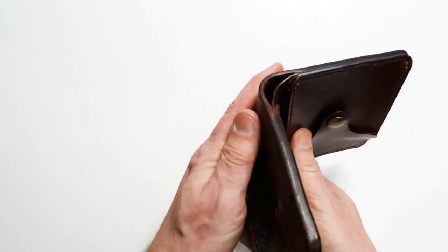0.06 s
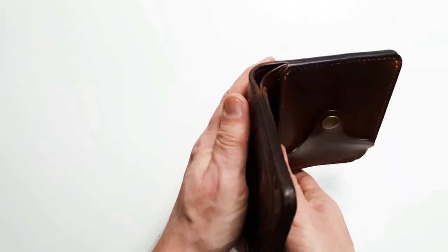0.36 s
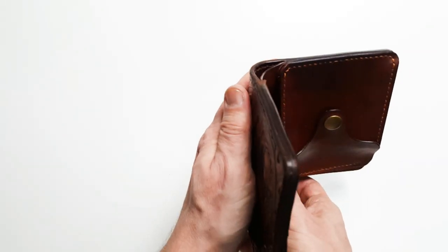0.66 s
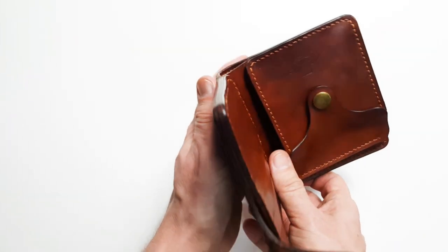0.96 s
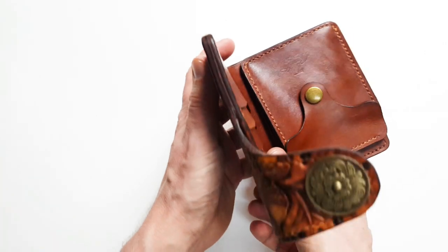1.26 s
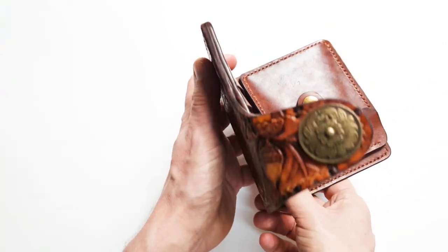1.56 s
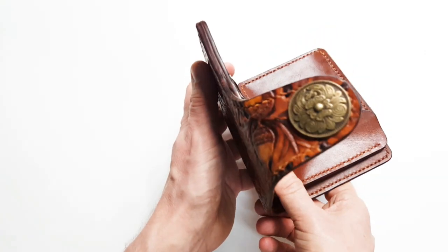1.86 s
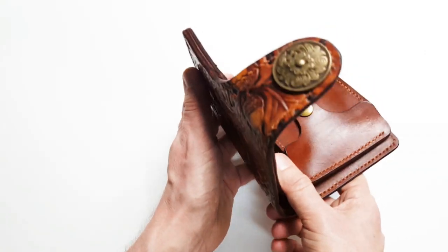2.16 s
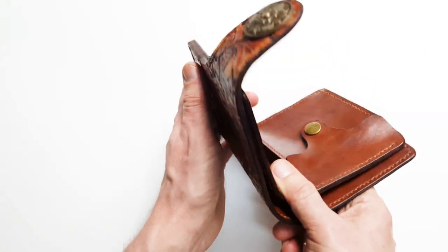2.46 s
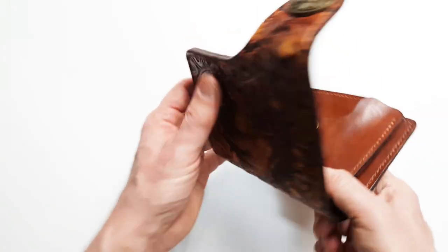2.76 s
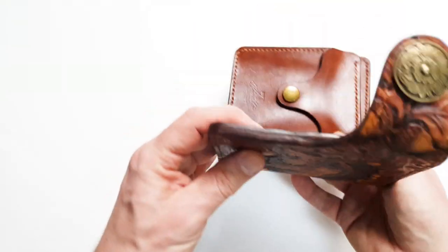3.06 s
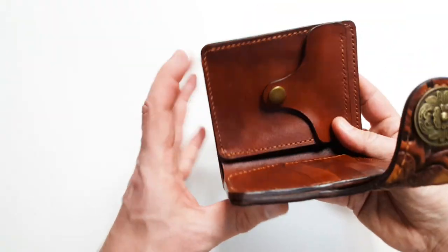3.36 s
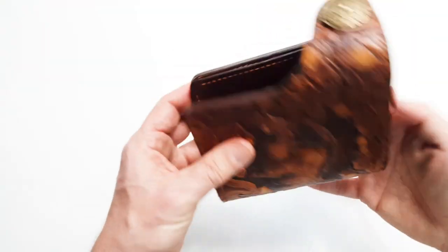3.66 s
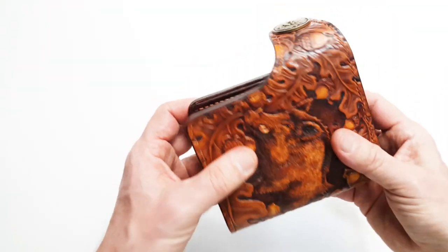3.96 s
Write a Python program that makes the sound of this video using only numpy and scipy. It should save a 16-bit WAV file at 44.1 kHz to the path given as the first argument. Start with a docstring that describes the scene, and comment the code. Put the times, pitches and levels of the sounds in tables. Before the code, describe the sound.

Leather creaks as a wallet is turned and opened close to the microphone in a quiet room. Fingers slide softly and the fold ticks; near the end, leather scrapes on leather with a brief squeak and sharp snaps.

```python
"""A stiff leather wallet, turned and opened by two hands close to the microphone in a quiet room.
Fingers slide over the hide and the fold ticks as it bends. Near the end leather grips on leather
and creaks: a squeak of fast slips that slows into a rattle, then single snaps.
Friction is streams of tiny catches; each tick or snap is a noise crack plus damped modes."""
import sys
import numpy as np
from scipy import signal
from scipy.fft import rfft, irfft, next_fast_len
from scipy.io import wavfile

SR = 44100
rng = np.random.default_rng(int(sys.argv[2]) if len(sys.argv) > 2 else 0)


def unload_wav(signal):
    """Save mono or channel-first audio to the path in sys.argv[1] as 16-bit WAV at rate SR, clipped to [-1, 1]."""
    wavfile.write(
        sys.argv[1],
        SR,
        np.round(np.clip(np.atleast_2d(signal).T, -1, 1) * 32767).astype(np.int16),
    )


N = 176400
TIME = np.arange(N) / SR
SIDE_DB = -8   # side re mid, ahead of the width filter
SCRAPE_GRAINS_PER_S, SCRAPE_GRAIN_DB = 2700, 2.5

# stiff cover modes: freq_hz, gain_db, t60_s
COVER_MODES = [(1092, 0.5, 0.0078), (1297, -0.5, 0.011), (1620, 1, 0.0059), (2180, -1, 0.0063),
               (2466, -2.5, 0.0059), (3930, -15.5, 0.0027), (5270, -27.5, 0.012), (6310, -25, 0.0031)]


def from_db(db):
    return 10 ** (np.asarray(db) / 20)


def unit_rms(x):
    return x / np.sqrt(np.mean(x ** 2) + 1e-20)


def curve(rows):
    """Linear interpolation of time_s, value rows."""
    return np.interp(TIME, *np.transpose(rows))


def wobble(rate_hz):
    """Random drift, rms 1."""
    return unit_rms(np.interp(TIME * rate_hz, np.arange(N), rng.standard_normal(N)))


def bandpass(x, low_hz, high_hz):
    sos = signal.butter(2, [low_hz, high_hz], "band", fs=SR, output="sos")
    return signal.sosfilt(sos, x + 1e-18)


def coloured(x, colour):
    """FFT filter from freq_hz, gain_db rows."""
    hz, db = np.transpose(colour)
    size = next_fast_len(x.shape[-1] + 4096)
    bins_hz = np.maximum(np.arange(size // 2 + 1) * SR / size, 1)
    gain = from_db(np.interp(np.log(bins_hz), np.log(hz), db))
    return irfft(rfft(x, size) * gain, size)[..., :x.shape[-1]]


def stereo(mid, side):
    """Mid/side to left/right: narrow bass, wide treble."""
    # stereo width: freq_hz, side_gain_db
    width = [(60, -13.5), (160, -16), (350, -8), (700, -4), (1300, -6), (2400, -0.5), (4200, 0.5),
             (15000, -0.5)]
    return mid + coloured(side, width) * np.array([[1], [-1]])


def grains(per_s, spread_db):
    """Two independent streams of tiny friction catches of uneven size."""
    sizes = from_db(spread_db * np.minimum(rng.exponential(1, (2, N)), 5))
    signs = rng.choice([-1, 1], (2, N))
    return sizes * signs * (rng.random((2, N)) < per_s / SR)


def texture(streams, colour):
    """Two streams, filtered and normalised, as mid and side of a stereo sound."""
    return stereo(*unit_rms(coloured(streams, colour)))


def releases(events, modes, low_cut_hz, crack_top_hz, crack_db):
    """Crack plus ringing modes, mid/side. Events: start_s, level_db, bite_db, pitch_ratio."""
    build_cycles, treble_hz, mode_spread_db = 0.14, 1840, 1.1
    crack_t60_s, crack_low_hz = 0.0081, 2930
    lead = SR // 500   # pre-ring of the zero-phase low cut
    t = np.maximum(np.arange(SR // 50) - lead, 0) / SR
    hz, mode_db, t60_s = np.transpose(modes)[:, :, None]
    sign = (-1) ** np.arange(len(modes))[:, None]
    envelopes = sign * (1 - np.exp(-t * hz / build_cycles)) * from_db(mode_db - 60 * t / t60_s)
    low_cut = signal.butter(4, low_cut_hz, "high", fs=SR, output="sos")
    treble = np.clip(np.log2(hz[:, 0] / treble_hz), 0, 1)   # share of bite_db per mode
    bursts = rng.standard_normal((len(events), 2, len(t))) * (t > 0) * from_db(-60 * t / crack_t60_s)
    cracks = bandpass(bursts, crack_low_hz, crack_top_hz)
    scatter = rng.standard_normal((len(events), 2, len(modes)))
    out = np.zeros((2, N + len(t)))
    for (start_s, level_db, bite_db, ratio), crack, (uneven, sideways) in zip(events, cracks, scatter):
        rings = signal.sosfiltfilt(low_cut, envelopes * np.sin(2 * np.pi * hz * ratio * t))
        mid_gains = from_db(mode_spread_db * uneven + bite_db * treble)
        side_gains = mid_gains * sideways * from_db(SIDE_DB)
        body = np.array([mid_gains, side_gains]) @ rings / np.abs(rings.sum(0)).max()
        at = min(int(start_s * SR) - lead, N - 1)
        out[:, at:at + len(t)] += from_db(level_db) * (body + from_db(crack_db + bite_db) * crack)
    return out[:, :N]


def room_air():
    """Still air: steady noise, mostly bass."""
    # air spectrum: freq_hz, gain_db
    colour = [(20, 6), (32, -3), (55, -21.5), (100, -3.5), (180, 1), (300, -7.5), (430, -10), (800, -14),
              (1500, -25.5), (3000, -27.5), (7000, -34.5), (16000, -34)]
    return from_db(-65) * texture(rng.standard_normal((2, N)), colour)


def finger_slide():
    """Skin on hide: dense catches make a fine, fluttering hiss."""
    # hiss envelope: time_s, level_db
    levels = [(0, -97), (.25, -80), (.41, -66), (.45, -73.5), (.52, -71.5), (.62, -89), (.85, -79),
              (.94, -71.5), (1.05, -70.5), (1.11, -75.5), (1.2, -66.5), (1.32, -76), (1.5, -85),
              (1.72, -80.5), (1.98, -85), (2.13, -71), (2.27, -75), (2.32, -62), (2.37, -66), (2.43, -61),
              (2.55, -69), (2.67, -83), (2.77, -69.5), (2.85, -62), (2.9, -69.5), (3.01, -65.5),
              (3.11, -79), (3.27, -72), (3.35, -81), (3.46, -72), (3.53, -79.5), (3.6, -65), (3.67, -63.5),
              (3.78, -62), (3.88, -60.5), (3.92, -72), (3.96, -63.5), (4, -60)]
    # hiss spectrum: freq_hz, gain_db
    colour = [(1500, 0.5), (3000, -8.5), (5000, -9.5), (8500, -10.5), (11500, -4.5), (14000, -11.5),
              (16000, -17)]
    flutter_db = 1.1 * wobble(rate_hz=44.4)
    return from_db(curve(levels) + flutter_db) * texture(grains(per_s=7000, spread_db=3), colour)


def leather_scrape():
    """Leather dragging on leather: sparser catches make a grainy scrape."""
    # scrape envelope: time_s, level_db
    levels = [(0, -74), (.39, -70), (.58, -73.5), (.75, -78), (.93, -68), (1.1, -71.5), (1.24, -68),
              (1.35, -74.5), (1.95, -71.5), (2.25, -65), (2.38, -68), (2.45, -59.5), (2.51, -69.5),
              (2.66, -74.5), (2.76, -63), (2.9, -70), (3.0, -63), (3.11, -70.5), (3.47, -68), (3.53, -70),
              (3.57, -61), (3.66, -47), (3.76, -46.5), (3.88, -51.5), (3.92, -56), (3.98, -57), (4, -40.5)]
    # scrape spectrum: freq_hz, gain_db
    colour = [(300, -22.5), (600, -15), (1000, 1.5), (1500, 4.5), (2100, -4), (2900, -5.5), (4200, -13.5),
              (7000, -22), (15000, -33)]
    return from_db(curve(levels)) * texture(grains(SCRAPE_GRAINS_PER_S, SCRAPE_GRAIN_DB), colour)


def handling_rumble():
    """Dull noise of the wallet shifting in the hands."""
    # rumble envelope: time_s, level_db
    levels = [(0, -67.5), (1.2, -65.5), (1.5, -69), (1.85, -64), (2.2, -65), (2.33, -56), (2.45, -63),
              (2.7, -66.5), (3.1, -67), (3.38, -64), (3.65, -57.5), (3.87, -58.5), (4, -59)]
    # rumble spectrum: freq_hz, gain_db
    colour = [(40, -17.5), (75, -2.5), (120, -2), (180, -5.5), (300, -6), (450, -25), (900, -21.5),
              (3000, -58)]
    return from_db(curve(levels)) * texture(rng.standard_normal((2, N)), colour)


def fold_ticks():
    """The bending fold ticks and rings briefly; mid/side."""
    # fold ticks: start_s, level_db, bite_db, pitch_hz
    ticks = [(0.1346, -53.5, -13, 1400), (0.182, -56, -2, 1490), (0.411, -46.5, 7, 1540),
             (1.368, -49.5, 7.5, 1630), (1.38, -49, -4, 1150), (1.5602, -49.5, 3, 1530),
             (1.6368, -56.5, 11, 1400), (1.7323, -49.5, -5, 1280), (1.834, -54.5, -1, 1390),
             (1.8538, -57, -2, 1510), (1.8937, -49, -0.5, 1480), (1.935, -48, -1, 1460),
             (2.0415, -49.5, 2.5, 1470), (2.0469, -53, 1, 1450), (2.0754, -44, 0, 1530),
             (2.1132, -44.5, 2, 1500), (2.12, -47, -4, 1500), (2.146, -44, 5.5, 1520),
             (2.162, -43, -3, 1500), (2.199, -40.5, 3, 1510), (2.2446, -38.5, 1.5, 1500),
             (2.2803, -41.5, -1, 1490), (2.3, -41.5, 0, 1490), (2.3302, -47.5, 5, 1460),
             (2.3364, -41, 2, 1450), (2.362, -47.5, 1, 1480), (2.5935, -51.5, -4, 1510),
             (2.619, -52.5, 3.5, 1530), (2.7018, -47, 0, 1480), (2.726, -43, -3, 1490),
             (2.7312, -51, -2, 1620), (2.735, -46, -8, 1550), (2.7484, -47.5, -6, 1530),
             (2.776, -46, -6, 1515), (2.8247, -48, -12, 1350), (2.831, -43.5, -5, 1430),
             (2.8347, -44, -4, 1660), (2.8392, -42, -3, 1460), (2.861, -48, -6, 1490),
             (2.9298, -46, -14, 1275), (3.006, -50, -12, 1380)]
    # bent fold modes: freq_hz, gain_db, t60_s
    modes = [(1040, 2, 0.0023), (1495, 8.5, 0.012), (2380, -13, 0.0046), (3530, -6, 0.009),
             (5400, -17, 0.0073), (8800, -24, 0.0039)]
    main_hz = modes[1][0]
    events = [(start_s, db, bite_db, hz / main_hz) for start_s, db, bite_db, hz in ticks]
    return releases(events, modes, low_cut_hz=634, crack_top_hz=17000, crack_db=-16)


def fingertip_drag():
    """Tiny catches ring the taut cover, harder and harder until the finger stops."""
    # cover resonances: freq_hz, gain_db, bandwidth_hz
    resonances = [(1386, 6, 98), (1980, -2.5, 390), (2800, -1.5, 450), (5270, -12.5, 420)]
    stop_s, top_db, rise_db_per_s, fall_db_per_s = 0.416, -59.5, 109, 700
    catches = grains(SCRAPE_GRAINS_PER_S, SCRAPE_GRAIN_DB) + 1e-18
    rings = np.zeros((2, N))
    for k, (hz, db, bandwidth_hz) in enumerate(resonances):
        resonator = signal.iirpeak(hz, hz / bandwidth_hz, fs=SR)
        rings += (-1) ** k * from_db(db) * signal.lfilter(*resonator, catches)
    since_s = TIME - stop_s
    level_db = top_db + np.minimum(rise_db_per_s * since_s, -fall_db_per_s * since_s)
    return from_db(level_db) * stereo(*unit_rms(rings))


def grip_hum(centre_s, pitch_hz, level_db):
    """A faint low tone swells and fades as the grip shifts."""
    half_width_s = 0.091
    swell = np.exp(-((TIME - centre_s) / half_width_s) ** 2)
    return from_db(level_db) * swell * np.sin(2 * np.pi * pitch_hz * TIME)


def cover_snaps(events):
    """Slips ring the stiff cover; mid/side."""
    return releases(events, COVER_MODES, low_cut_hz=770, crack_top_hz=8200, crack_db=-19)


def single_slips():
    """Leather grips leather and lets go in separate snaps; mid/side."""
    # slips: start_s, level_db, bite_db
    slips = [(0.9026, -46, 14), (3.3055, -51.5, 11), (3.3825, -43.5, 6), (3.4021, -38.5, -2.5),
             (3.4307, -42, 8), (3.45, -43, -13), (3.46, -38, -12), (3.4712, -38, -2), (3.4721, -40, 1),
             (3.4821, -35.5, -5), (3.4888, -39, 2), (3.5475, -33.5, 4.5), (3.5685, -38.5, 6.5),
             (3.5712, -33.5, -2), (3.5858, -37.5, -9), (3.615, -30, -23), (3.6978, -35, -10),
             (3.711, -32, -14), (3.7207, -28, -22), (3.765, -33.5, -1), (3.82, -26, -6),
             (3.8232, -28.5, -3), (3.8275, -30, -7), (3.8322, -27, -6), (3.8402, -24, -3), (3.847, -24, 0),
             (3.8538, -21.5, -2), (3.8683, -18.5, -3), (3.8745, -25, 0), (3.8828, -19.5, -4),
             (3.8917, -25.5, -4), (3.8934, -25.5, 2.5), (3.899, -22, -4.5), (3.9483, -34, -13),
             (3.9532, -31.5, -4), (3.9596, -31.5, 1.5), (3.9657, -33.5, -1), (3.9955, -29, -4)]
    return cover_snaps([(*slip, 1) for slip in slips])


def squeak():
    """Fast slips lock into a rough harmonic tone, shaped by the leather's resonances; mid/side."""
    # slip rate: time_s, pitch_hz
    pitches = [(3.58, 831.4), (3.598, 894), (3.609, 719), (3.617, 841), (3.621, 794), (3.633, 885),
               (3.64, 736), (3.646, 873), (3.656, 799), (3.662, 865), (3.674, 826.6), (3.679, 678),
               (3.72, 706)]
    # squeak envelope: time_s, level_db
    levels = [(3.575, -66), (3.592, -46.5), (3.61, -49), (3.635, -42), (3.65, -38), (3.67, -42),
              (3.681, -37.5), (3.715, -42.5), (3.78, -55)]
    # leather response: freq_hz, gain_db
    colour = [(660, -17.5), (830, -6.5), (1300, -3.5), (1650, 5), (2200, -12), (2700, -8.5), (3150, -25),
              (3650, -17.5), (5000, -35), (7000, -39)]
    jitter, rough_db, rough_hz = .025, 4, 302.1
    hz = curve(pitches) * np.exp(jitter * wobble(rough_hz))
    phase = 2 * np.pi * np.cumsum(hz) / SR
    sounding = (TIME > levels[0][0]) & (TIME < levels[-1][0])
    tone = np.zeros((2, N))
    for k in range(1, 10):
        gain = from_db(np.interp(k * hz, *np.transpose(colour)) + rough_db * wobble(rough_hz))
        tone += gain * np.array([np.sin(k * phase), from_db(SIDE_DB) * np.cos(k * phase)])
    return tone / np.std(tone[0, sounding]) * from_db(curve(levels)) * sounding


def rattle():
    """Slower, ragged slips, each ringing the cover at a slightly different pitch; mid/side."""
    # slip rate: time_s, slips_per_s
    rates = [(3.686, 295), (3.712, 406), (3.733, 387), (3.743, 240), (3.757, 370), (3.8, 267), (3.817, 320)]
    # slip strength: time_s, level_db
    levels = [(3.686, -36), (3.715, -35.5), (3.75, -33.5), (3.768, -30), (3.793, -35.5), (3.817, -29.5)]
    # broad, soft contact: freq_hz, gain_db
    colour = [(800, -4), (1150, -1), (1550, 3), (2250, -11.5), (2750, 1), (4000, 1), (7000, -3)]
    jitter, spread_db, detune = .07, 1, 0.048
    events, start_s = [], levels[0][0]
    for gap_draw, level_draw, pitch_draw in rng.standard_normal((100, 3)):
        if start_s >= levels[-1][0]:
            break
        level_db = np.interp(start_s, *np.transpose(levels)) + spread_db * level_draw
        events.append((start_s, level_db, 0, np.exp(detune * pitch_draw)))
        start_s += np.exp(jitter * gap_draw) / np.interp(start_s, *np.transpose(rates))
    return coloured(cover_snaps(events), colour)


def room_tail(t60_s, delay_s):
    """Dense small-room reflections, unit energy."""
    t = TIME[:SR // 2]
    tail = rng.standard_normal(len(t)) * from_db(-60 * np.minimum(t / t60_s, 4)) * (t >= delay_s)
    return tail / np.sqrt(np.sum(tail ** 2) + 1e-20)


def in_room(mid_side, tails, wet_db):
    """The mid feeds one tail each for mid and side; returns left/right."""
    reflections = np.array([signal.oaconvolve(mid_side[0], tail)[:N] for tail in tails])
    return stereo(*(mid_side + from_db(wet_db) * reflections))


def scene():
    """Ticks and creak, slightly right, over friction, hums and room air."""
    bed = room_air() + finger_slide() + leather_scrape() + handling_rumble() + fingertip_drag()
    bed += grip_hum(centre_s=.64, pitch_hz=115, level_db=-62.5)
    bed += grip_hum(centre_s=3.24, pitch_hz=121.5, level_db=-59)
    tails = [room_tail(t60_s=0.079, delay_s=.003) for _ in range(2)]
    wallet = fold_ticks() + single_slips() + squeak() + rattle()
    pan_db = [[-.5], [.5]]
    return in_room(wallet, tails, wet_db=-10) * from_db(pan_db) + bed


def record(dry):
    """Slight top-end lift, then a steep low-pass."""
    # microphone response: freq_hz, gain_db
    response = [(11000, 0), (16000, 2)]
    cutoff_hz = 15900
    low_pass = signal.ellip(12, .1, 70, cutoff_hz, fs=SR, output="sos")
    return signal.sosfilt(low_pass, coloured(dry, response))


dry = scene()
out = record(dry)
unload_wav(out)
```